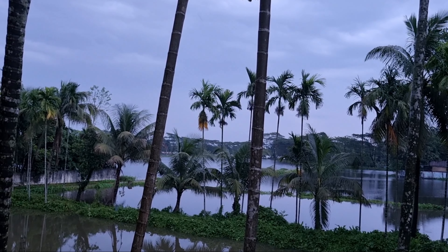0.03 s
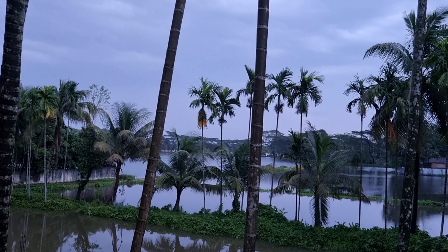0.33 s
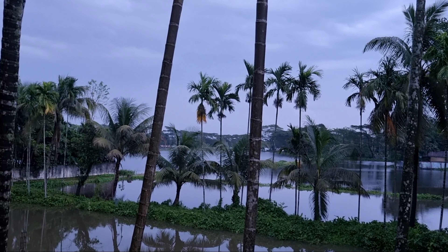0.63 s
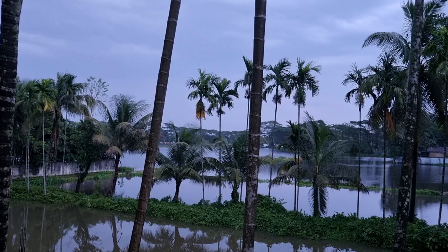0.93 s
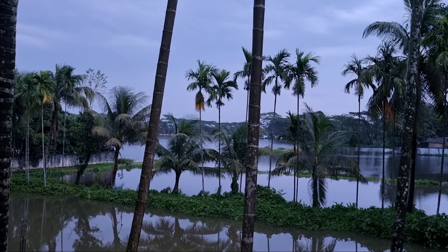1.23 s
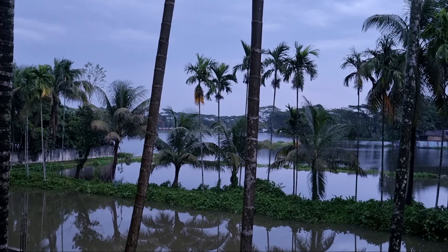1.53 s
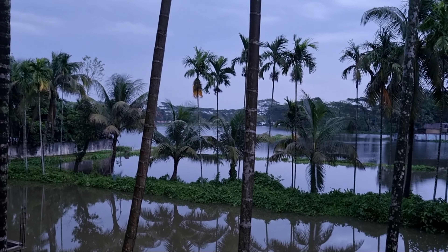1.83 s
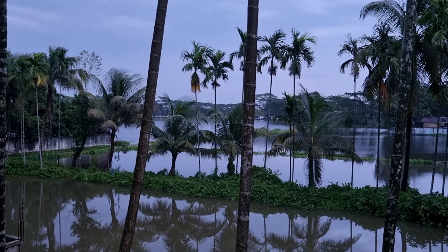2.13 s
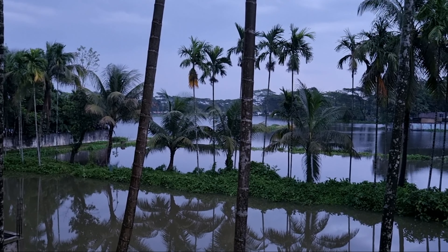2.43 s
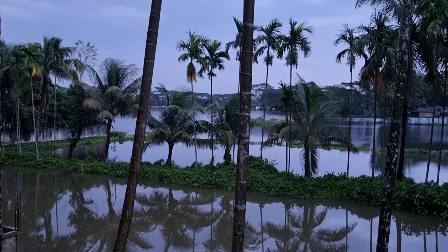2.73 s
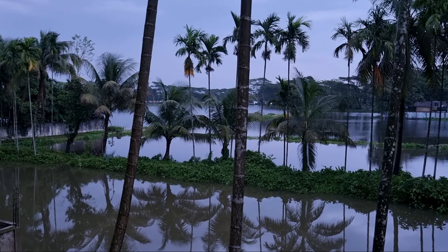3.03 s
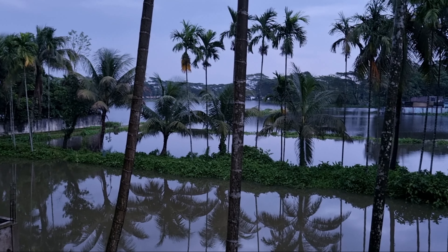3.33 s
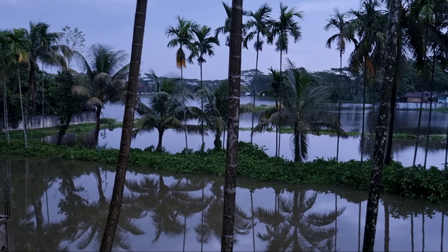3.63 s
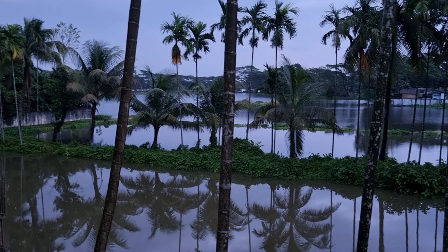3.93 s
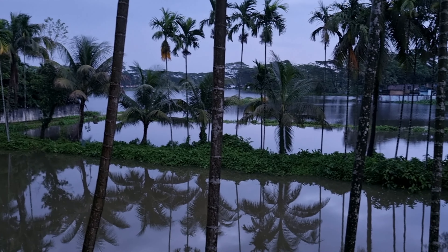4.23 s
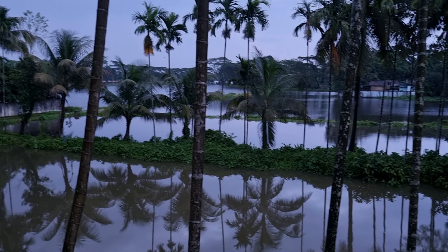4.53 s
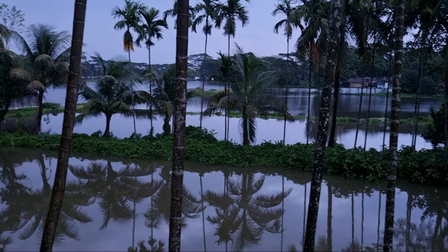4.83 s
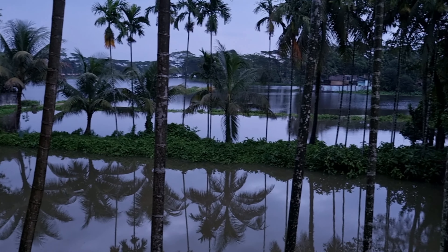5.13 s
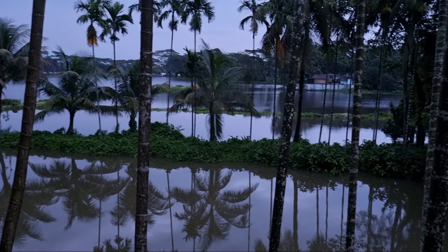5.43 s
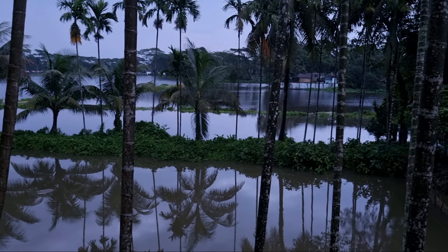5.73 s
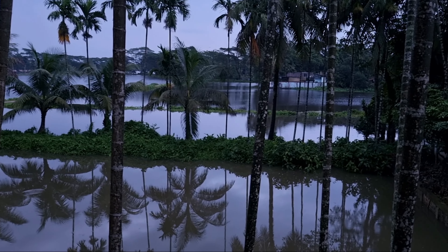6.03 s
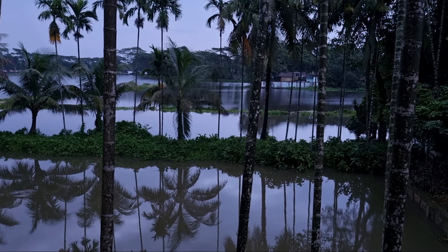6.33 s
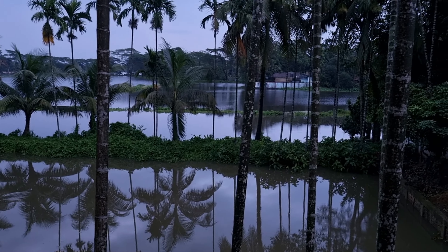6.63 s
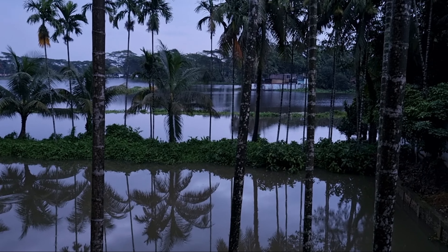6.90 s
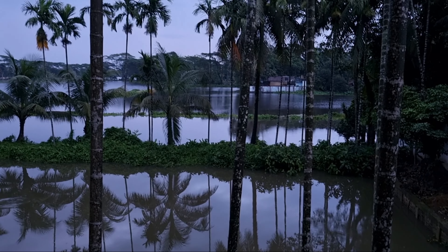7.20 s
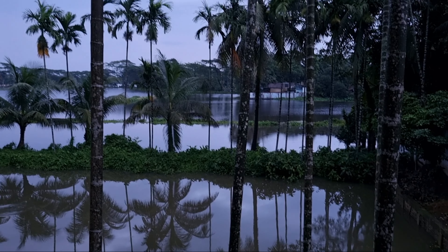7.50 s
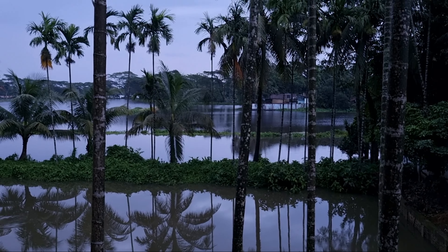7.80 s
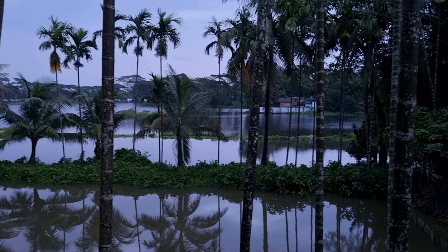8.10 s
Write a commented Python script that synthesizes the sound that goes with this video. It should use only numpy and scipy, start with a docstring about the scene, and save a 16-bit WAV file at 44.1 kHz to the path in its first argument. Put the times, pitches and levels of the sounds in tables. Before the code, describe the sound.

Outdoors by still water and palms, crickets keep up a steady shrill band, joined by a closer chirping cricket and thin, ticking buzzes. Above them a songbird gives two quick whistled phrases, a brief raspy chatter and, later, two more phrases, while distant birds answer throughout. A far engine drones quietly under a faint hiss of air, and a few soft scuffs and one light tap sound close to the microphone.

```python
"""A dense cricket chorus shrills at dusk over flooded palm groves; one near cricket chirps in wing
strokes and bush crickets buzz in trains of tooth clicks. A songbird repeats one whistled motif and
chatters once, its notes scattering among the trunks; other birds answer from far off.
A distant engine drones under it all, with faint air hiss, a light tap and soft scuffs close by."""
import sys
import numpy as np
from scipy import signal
from scipy.fft import rfft, irfft, next_fast_len
from scipy.io import wavfile
from scipy.ndimage import uniform_filter1d, map_coordinates

SR = 44100
rng = np.random.default_rng(int(sys.argv[2]) if len(sys.argv) > 2 else 0)


def master(y):
    """Save y as 16-bit WAV."""
    cut = np.clip(np.atleast_2d(y).T, -1, 1)
    pcm = np.round(cut * 32767)  # scale
    wavfile.write(sys.argv[1], SR, pcm.astype(np.int16))


N = 364266

# Chorus drift. Each row: time in seconds, relative level in dB, left over right in dB.
CHORUS_LEVELS = [(0.0, -54, 6), (0.44, -54.5, 4.5), (1.56, -52.5, 5.5), (2.97, -53.5, 5), (3.18, -53, 6.0),
                 (4.12, -53.5, 5.5), (5.77, -52.5, 5), (8.24, -51.5, 2.5), (8.26, -53, 4.0)]
# Near cricket. Each row: start and end in seconds, level in dB, fade in dB/s, direct path gain in dB.
CHIRP_BOUTS = [(.1, .73, -40.5, 6, -6.5), (3.262, 3.4, -47, 0, -3), (3.654, 3.78, -44.5, 0, 3),
               (3.874, 5.52, -40.5, 1.5, 1.5), (5.598, 5.97, -46, 11, 2.5)]
# Far field crickets. Each row: time in seconds, relative level in dB.
FAR_CRICKET_LEVELS = [(0.0, -57.5), (3.06, -63.5), (3.26, -60), (3.84, -56), (4.48, -61.5), (5.43, -56.5),
                      (5.93, -55.5), (6.17, -61), (7.87, -59.5), (8.26, -60.5)]
# Two bush crickets, low and high. Each row: start and end in seconds, pitch in Hz, level in dB.
BUZZ_BOUTS = [(0.815, 2.3, 6840, -61), (1.122, 1.3, 7060, -64), (2.573, 2.8, 7150, -63),
              (3.135, 3.8, 6760, -61.5), (4.605, 5.65, 6760, -59.5), (5.016, 6.5, 7200, -59.5),
              (7.312, 7.95, 6930, -58)]

# Song motif before stretching: high whistle, low whistle, flick, dive, closing note. Each row: offset
# and length in seconds, start, middle and end pitch in Hz, relative level in dB, roughness 0-1.
MOTIF = [(0, .068, 3280, 2939, 2880, -8, 0.08), (.119, 0.0595, 2530, 2362, 2378, -7, 0.09),
         (0.174, .024, 2456, 2620, 2760, -4, 0.2), (.201, .032, 2696, 1924, 1800, -7, .12),
         (0.231, 0.0332, 2380, 2209, 2010, 0.5, 0.52)]
# Motif repeats. Each row: start and closing note onset in seconds, base level at the close in dB,
# crescendo in dB, lift of the entry pitch in Hz.
PHRASES = [(1.194, 1.428, -41.5, -2.5, -170), (1.828, 2.06, -34.5, 1, -200), (6.296, 6.53, -30.5, -2.5, 72),
           (6.904, 7.172, -34, -4, 61)]
# Notes before a phrase. Each entry: length in seconds, start, middle and end pitch in Hz, roughness 0-1.
LEAD_INS = {"chip": (.026, 2700, 2280, 1780, 0.61), "step": (0.024, 2520, 2700, 2630, 0.19)}
# Onsets per lead-in. Each row: start in seconds, level in dB.
LEAD_IN_TIMES = {"chip": [(1.098, -44), (1.731, -45), (6.812, -36.5)], "step": [(1.153, -48.5),
                 (1.782, -41.5), (6.219, -41.5)]}
# Scolding notes. Each row: start and length in seconds, pitch in Hz, level in dB, roughness 0-1.
CHATTER = [(3.907, 0.054, 1995, -40.5, 0.4), (3.944, 0.037, 2430, -32, 0.42),
           (3.982, 0.037, 2202, -29.5, 0.5), (4.092, .039, 2030, -29, .14), (4.15, 0.0647, 1977, -34, 0.55),
           (4.253, 0.047, 2475, -31.5, .54)]
# Glide of a scolding note: pitch ratio at start, middle and end.
CHATTER_BEND = (1.005, 1, 1.04)
# Far bird calls. Each entry: length in seconds, start, middle and end pitch in Hz, roughness 0-1.
FAR_CALLS = {"falling": (.073, 3150, 2850, 2640, 0.38), "rising": (0.0735, 2980, 3170, 3000, 0.363),
             "thin": (0.0764, 3200, 3850, 3930, 0.13), "raspy": (0.0584, 3300, 3900, 3720, 0.522),
             "dive": (0.071, 3600, 2400, 1894, 0.71), "pip": (0.036, 3100, 2700, 2520, 0.24),
             "hoot": (0.023, 990, 975, 930, 0.18)}
# Onsets per far call. Each row: start in seconds, level in dB.
FAR_CALL_TIMES = {"falling": [(.271, -51), (.651, -53.5), (2.621, -53), (3.18, -53.5), (3.599, -55),
                  (4.55, -52), (5.615, -57), (7.662, -55.5)], "rising": [(.91, -55.5), (1.551, -49),
                  (2.28, -54.5), (2.81, -57), (3.46, -55.5), (4.05, -55.5), (5.371, -55), (6.7, -55),
                  (8.1, -57.5)], "thin": [(4.15, -58.5), (5.52, -58.5), (6.82, -55.5), (7.341, -58.5),
                  (7.791, -57.5)], "raspy": [(.99, -55.5), (1.67, -58.5), (2.14, -54), (3.68, -52.5),
                  (4.82, -52), (7.528, -49)], "dive": [(5.197, -50), (5.797, -49.5)], "pip": [(5.14, -51.5),
                  (5.751, -48)], "hoot": [(6.645, -65), (7.338, -57.5), (7.94, -61), (8.035, -60)]}
# Blur of the farthest birds. Each row: time in seconds, relative level in dB.
BIRD_BLUR_LEVELS = [(0, -60), (0.6, -62.5), (1.6, -56.5), (2.2, -55), (2.6, -64.5), (3.1, -69),
                    (3.8, -57.5), (4.9, -59), (5.5, -55.5), (6.1, -57), (7, -57.5), (8.26, -62)]

# Engine drift. Each row: time in seconds, relative levels of low throb and upper hum in dB.
ENGINE_LEVELS = [(0, -57.5, -73.5), (0.6, -61, -69.5), (1.3, -62.5, -78.5), (2.2, -63.5, -75.5),
                 (2.8, -64, -70.5), (4.3, -66.5, -74.5), (5.2, -66.6, -73.5), (6.2, -67.5, -68),
                 (7.7, -69, -67.5), (8.26, -68, -76)]
# Tap and scuffs. Each row: start in seconds, level in dB, length in seconds, upper band edge in Hz.
TOUCHES = [(1.572, -73, 0.35, 910), (3.433, -73.5, 0.095, 915), (4.297, -72, 0.17, 448),
           (5.577, -47, 0.0027, 750), (6.078, -68.5, 0.21, 925), (6.349, -64, 0.019, 507)]
# Spectra of the diffuse layers. Each row: frequency in Hz, relative density in dB.
CHORUS_SPECTRUM = [(6300, -37), (7400, -12.5), (7950, -6.5), (8500, -1.5), (8900, -0.5), (9350, -5.5),
                   (9750, -14.5), (10250, -18), (10700, -66)]
FAR_CRICKET_SPECTRUM = [(4100, -30), (4500, -1.5), (4750, 6.5), (5050, 5), (5350, -5), (5650, -4.5),
                        (6200, -59)]
BIRD_BLUR_SPECTRUM = [(1550, -22), (1900, -2), (2500, 0), (3150, 3.5), (3450, -3.5), (3850, 3), (4150, -37),
                      (5000, -34.5)]
RUMBLE_SPECTRUM = [(15, -50), (30, -15.5), (48, 2), (65, -4), (100, -4), (150, -7.5), (200, -18.5),
                   (320, -25), (700, -71)]
AIR_SPECTRUM = [(150, -8), (300, 0.5), (600, -0.5), (850, -1.5), (1050, 2), (1400, -0.5), (4000, 5.5),
                (6500, 5.5), (9800, 3.5), (11000, -42), (12500, -7.5), (15300, -5)]
# Grove echo. Each row: frequency in Hz, time to decay 60 dB in seconds.
ECHO_T60 = [(1000, 0.23), (2500, 0.8), (5000, 0.57), (10000, 0.56)]

CHIRP_PERIOD_S, STROKE_PERIOD_S = 0.2515, 0.043
BUZZ_PERIOD_S, BUZZ_LENGTH_S = 0.418, 0.22


def cricket_chorus(count=14):
    """Countless tiny crickets merge into one shrill band; the nearest trill on their own pitches."""
    level_db, left_db = curves(CHORUS_LEVELS)
    singers = np.zeros((2, N))
    for hz in np.linspace(8000, 9350, count):
        stroke_hz = rng.uniform(45, 150) * (1 + 0.04 * wobble(6.1))
        phase = np.cumsum(stroke_hz) / SR % 1
        pitch_hz = hz * (1 + 0.012 * (0.5 - phase) + 0.007 * wobble(200))
        trill = tone(pitch_hz) * np.sin(np.pi * phase) ** 2
        singers += trill * amp(along(CHORUS_SPECTRUM, hz) + 1.6 * wobble(1.7)) * pan(rng.normal(0, 13))
    crowd = amp(-14) * unit(singers) + wash(CHORUS_SPECTRUM, patchy_db=1.4)
    # the band's peak leans left, its edges right
    crowd = filtered(crowd, lambda hz: pan(np.interp(hz, [7700, 8900, 10200], [-5, 1.5, -3])))
    return amp(level_db + 3) * unit(crowd) * pan(left_db)


def chirp(high_hz=5580, low_hz=4570, stroke_s=0.031, weak_db=-7, jitter=0.0093, scatter_db=1.3):
    """Three uneven wing strokes, the first weak; the pitch falls during each."""
    u = progress(stroke_s)
    glide_hz = high_hz + (low_hz - high_hz) * u ** 1.243
    out = np.zeros(int((2 * STROKE_PERIOD_S + stroke_s) * SR) + len(u))
    for k, db in enumerate([weak_db, 0, 0]):
        pitch_hz = glide_hz * (1 + jitter * wobble(500, len(u)))
        stroke = tone(pitch_hz) * np.abs(np.sin(np.pi * u)) ** 1.6
        add(out, k * STROKE_PERIOD_S, amp(db + scatter_db * rng.standard_normal()) * stroke)
    return out


def near_cricket():
    """Four chirps a second in bouts, close on the right, at first screened by leaves."""
    out = np.zeros((2, N))
    for start_s, end_s, db, fade_db_per_s, direct_db in CHIRP_BOUTS:
        for s in np.arange(start_s, end_s, CHIRP_PERIOD_S):
            sound = amp(db - fade_db_per_s * (s - start_s)) * chirp()
            add(out, s, grove(sound, direct_db, trunks_db=-6, trunks_t60_s=0.22, echo_db=-11))
    return out * pan(-8.5)


def far_crickets(count=9):
    """Distant field crickets, each at its own pace, blur into a band of noise."""
    singers = np.zeros((2, N))
    for _ in range(count):
        period_s = CHIRP_PERIOD_S * np.exp(0.08 * rng.standard_normal())
        series = np.zeros(N)
        for s in np.arange(rng.random() * period_s, N / SR, period_s):
            add(series, s, amp(rng.normal(0, 4.1)) * chirp())
        singers += grove(series, direct_db=-17, trunks_db=5.5, trunks_t60_s=0.055, echo_db=-0.5)[:, :N]
    crowd = unit(amp(-5) * unit(singers) + wash(FAR_CRICKET_SPECTRUM, patchy_db=0.5))
    return amp(curves(FAR_CRICKET_LEVELS)[0] + 2) * crowd * pan(-7.5)


def buzz(hz, click_hz=152, ring_s=0.00048):
    """A swelling train of tooth clicks, each ringing the wing briefly."""
    u = progress(BUZZ_LENGTH_S)
    rate_hz = click_hz * (1 + 0.027 * rng.standard_normal() + 0.0057 * wobble(30, len(u)))
    age_s = np.cumsum(rate_hz) / SR % 1 / rate_hz
    clicks = (np.exp(-age_s / ring_s / 2) * age_s) ** 2
    wing = tone(hz * (1 + 0.0132 * wobble(297.5, len(u))))
    flutter = amp(2.2 * wobble(150, len(u)))
    swell = np.minimum(0.82 + 2 * u, 1) * signal.windows.tukey(len(u), 0.15)
    return unit(clicks * wing * flutter * swell)


def bush_crickets():
    """Buzzes repeat at a steady pace through each bout."""
    out = np.zeros((2, N))
    for start_s, end_s, hz, db in BUZZ_BOUTS:
        for s in np.arange(start_s, end_s, BUZZ_PERIOD_S):
            sound = amp(db) * buzz(hz)
            add(out, s, grove(sound, direct_db=-5, trunks_db=-10.5, trunks_t60_s=0.018, echo_db=-4))
    return out * pan(-2.5)


def syllable(length_s, start_hz, middle_hz, end_hz, rough, rasp_hz=330, overtone_db=-46):
    """A whistle gliding through three pitches, with faint overtones; roughness shakes pitch and level."""
    u = progress(length_s)
    glide_hz = np.polyval(np.polyfit([0, 0.5, 1], [start_hz, middle_hz, end_hz], 2), u)
    pitch_hz = glide_hz * (1 + rough * 0.124 * wobble(2 * rasp_hz, len(u)))
    overtones = sum(tone(k * pitch_hz) for k in range(2, 6))
    voice = tone(pitch_hz) + amp(overtone_db) * overtones
    voice *= amp(rough * 4 * wobble(rasp_hz, len(u)))
    # a small throat radiates little below its lowest note
    throat = signal.butter(12, min(1800, 0.95 * middle_hz), "high", fs=SR, output="sos")
    return unit(signal.sosfilt(throat, voice * signal.windows.tukey(len(u), 0.33)))


def song_notes():
    """Lead-ins, the motif stretched to each phrase, and chatter, as (start s, level dB, sound)."""
    notes = [(s, db, syllable(*LEAD_INS[kind])) for kind in LEAD_INS for s, db in LEAD_IN_TIMES[kind]]
    first_s, last_s = MOTIF[0][0], MOTIF[-1][0]
    for s, closing_s, closing_db, crescendo_db, lift_hz in PHRASES:
        stretch = (closing_s - s) / last_s
        for offset_s, length_s, start_hz, middle_hz, end_hz, db, rough in MOTIF:
            effort_db = closing_db + crescendo_db * (offset_s / last_s - 1)
            entry_hz = start_hz + lift_hz * (offset_s == first_s)
            note = syllable(stretch * length_s, entry_hz, middle_hz, end_hz, rough)
            notes.append((s + stretch * offset_s, effort_db + db, note))
    for s, length_s, hz, db, rough in CHATTER:
        pitches_hz = hz * np.array(CHATTER_BEND)
        notes.append((s, db, syllable(length_s, *pitches_hz, rough, overtone_db=-30.5)))
    return notes


def songbird(loud_db=-26.5, openness=0.14):
    """Song scatters among the trees; the loudest notes come through the leaves most directly."""
    out = np.zeros((2, N))
    for s, db, note in song_notes():
        open_db = openness * (db - loud_db)
        add(out, s, grove(amp(db) * note, direct_db=-8.5 + open_db, trunks_db=-6,
                          trunks_t60_s=0.27, echo_db=-9.5 - open_db))
    return out * pan(-2.2)


def far_birds(pitch_scatter=0.01224):
    """Each bird repeats its own call, heard mostly as scatter and echo; the farthest blur together."""
    calls = np.zeros((2, N))
    for kind, (length_s, *glide_hz, rough) in FAR_CALLS.items():
        for s, db in FAR_CALL_TIMES[kind]:
            pitches_hz = np.array(glide_hz) * (1 + pitch_scatter * rng.standard_normal())
            note = amp(db) * syllable(length_s, *pitches_hz, rough)
            add(calls, s, grove(note, direct_db=-15.5, trunks_db=-7.5, trunks_t60_s=0.034, echo_db=-1))
    blur = amp(curves(BIRD_BLUR_LEVELS)[0] + 1.5) * wash(BIRD_BLUR_SPECTRUM, patchy_db=5.5)
    return calls * pan(-3) + blur * pan(-2)


def engine(firing_hz=25.7):
    """A far engine: only a few low orders and a rumble carry over the water."""
    throb_db, hum_db = curves(ENGINE_LEVELS)
    rate_hz = firing_hz * (1 + 0.0121 * wobble(3))
    order = lambda k: np.sqrt(2) * tone(k * rate_hz) * amp(0.9 * wobble(7.2))
    throb = amp(-4) * order(2) + amp(-7.5) * order(3)
    mid, side = wash(RUMBLE_SPECTRUM, patchy_db=3)
    rumble = np.array([mid + amp(-4) * side, mid - amp(-17) * side])
    return (amp(throb_db) * throb + amp(hum_db - 0.5) * order(5) + amp(-67) * rumble) * pan(-2.5)


def tap_and_scuffs():
    """Light touches close on the right: dull, decaying noise bursts."""
    out = np.zeros((2, N))
    for s, db, length_s, top_hz in TOUCHES:
        u = progress(length_s)
        burst = rng.standard_normal(len(u)) * np.exp(-3 * u)
        band = signal.butter(2, [120, top_hz], "band", fs=SR, output="sos")
        add(out, s, amp(db) * unit(signal.sosfilt(band, burst)) * pan(-10.5))
    return out


def air():
    """Faint, diffuse hiss of open air."""
    return amp(-57.5) * wash(AIR_SPECTRUM, patchy_db=3) * pan(-1.2)


def grove(x, direct_db, trunks_db, trunks_t60_s, echo_db):
    """Paths from a source on the right: direct, quick scatter off near trunks, long echo."""
    hz, frame_s, noise = signal.stft(rng.standard_normal((2, SR * 2 // 3)), SR, nperseg=256)
    decay = amp(-60 * frame_s / along(ECHO_T60, hz)[:, None])
    echo = signal.istft(noise * decay, SR, nperseg=256)[1]
    t = np.arange(echo.shape[1]) / SR
    trunks = rng.standard_normal(echo.shape) ** 3 * amp(-60 * t / trunks_t60_s)  # cubed: sparse spikes
    paths = amp(echo_db) * echo / np.linalg.norm(echo[0])
    paths += amp(trunks_db) * trunks / np.linalg.norm(trunks[0])
    paths[[0, 1], [20, 0]] += amp(direct_db)  # left lags 20 samples
    return signal.fftconvolve(x[None], paths, axes=1)


def wash(spectrum, patchy_db):
    """Diffuse stereo noise of rms 1 with drifting patches of gain."""
    noise = signal.stft(rng.standard_normal((2, N)), nperseg=512)[2]
    patches = uniform_filter1d(rng.standard_normal(noise.shape[1:]), size=3, axis=0)
    patches = uniform_filter1d(patches, size=16, axis=1)
    pair = signal.istft(noise * amp(patchy_db * unit(patches)), nperseg=512)[1][:, :N]
    return unit(filtered(pair, lambda hz: amp(along(spectrum, hz))))


def amp(db):
    """Decibels to gain."""
    return 10 ** (np.asarray(db) / 20)


def unit(x):
    """Scale to rms 1."""
    return x / np.sqrt(np.mean(x ** 2) + 1e-20)


def along(points, hz):
    """Interpolate (Hz, value) points on a log axis."""
    knots_hz, values = np.transpose(points)
    return np.interp(np.log(hz + 1), np.log(knots_hz + 1), values)


def curves(rows):
    """One value per sample for each column after the time."""
    s, *columns = np.transpose(rows)
    return [np.interp(np.arange(N) / SR, s, column) for column in columns]


def wobble(rate_hz, size=N):
    """A smooth random curve with rate_hz knots a second."""
    knots = rng.standard_normal(int(size * rate_hz / SR) + 4)
    return map_coordinates(knots, [np.arange(size) * rate_hz / SR])


def filtered(x, response):
    """Apply a gain given as a function of Hz."""
    size = next_fast_len(N + SR // 2)
    return irfft(rfft(x, size) * response(np.fft.rfftfreq(size, 1 / SR)), size)[..., :N]


def pan(left_db):
    """Left and right gains of constant power."""
    gains = amp(np.array([left_db, -left_db]).reshape(2, -1) / 2)
    return gains / np.sqrt(np.mean(gains ** 2, axis=0))


def tone(hz):
    """A sine that follows a pitch curve."""
    return np.sin(2 * np.pi * (np.cumsum(hz) / SR + rng.random()))


def progress(length_s):
    """Ramp from 0 to 1."""
    return np.linspace(0, 1, max(int(length_s * SR), 64))


def add(track, start_s, x):
    """Mix x into the track."""
    i = int(np.clip(round(start_s * SR), 0, N - 1))
    track[..., i:i + x.shape[-1]] += x[..., :N - i]


def scene():
    """Insects and birds over the engine, light touches and air."""
    hiss = air()
    insects = cricket_chorus() + near_cricket() + far_crickets() + bush_crickets()
    return insects + songbird() + far_birds() + engine() + tap_and_scuffs() + hiss


def record(dry, top_hz=15600):
    """Brick-wall low-pass."""
    return filtered(dry, lambda hz: hz < top_hz)


dry = scene()
out = record(dry)
master(out)
```